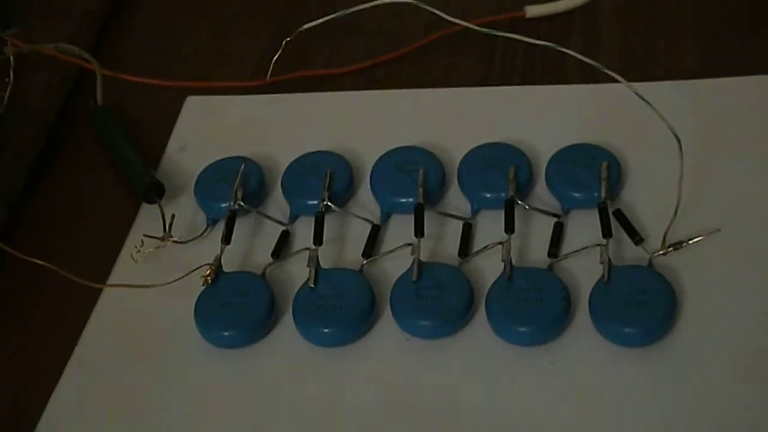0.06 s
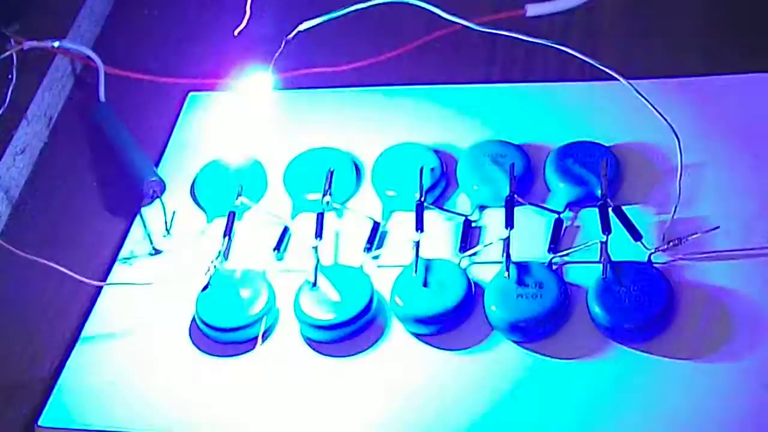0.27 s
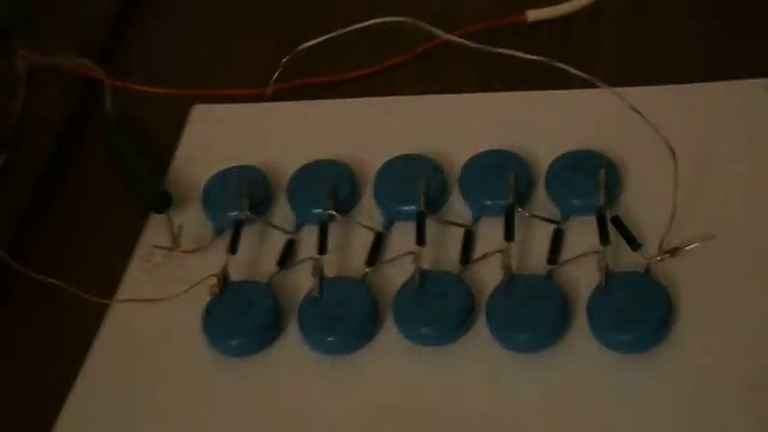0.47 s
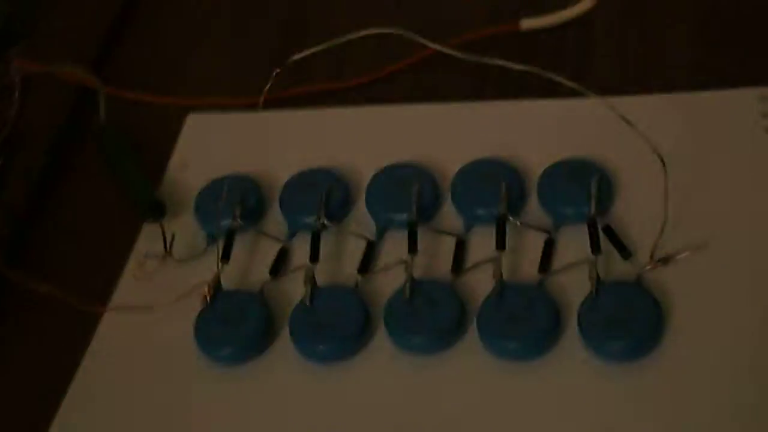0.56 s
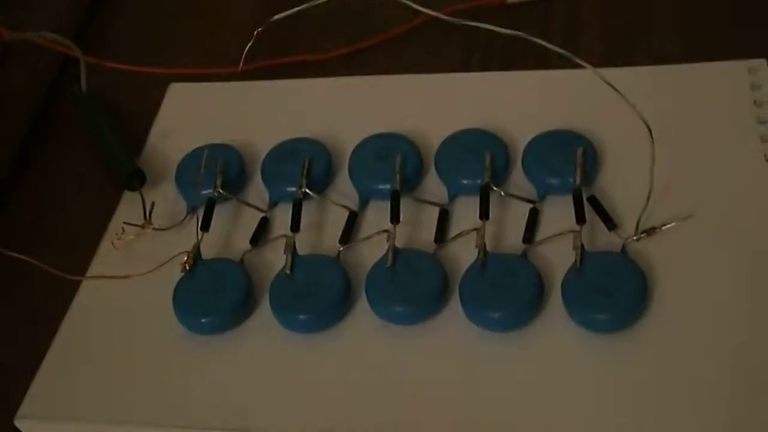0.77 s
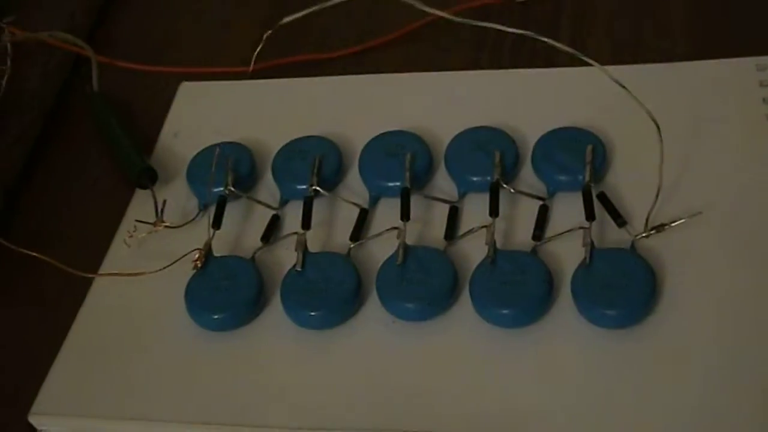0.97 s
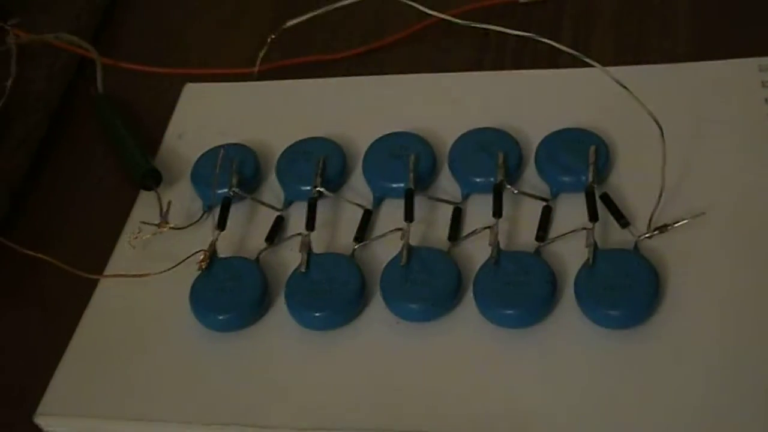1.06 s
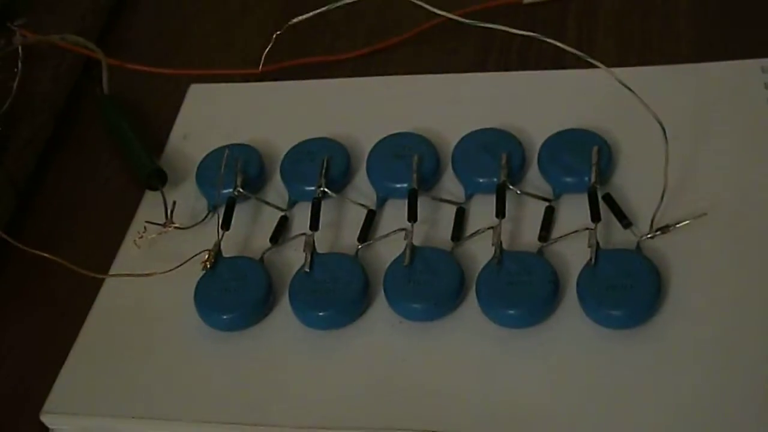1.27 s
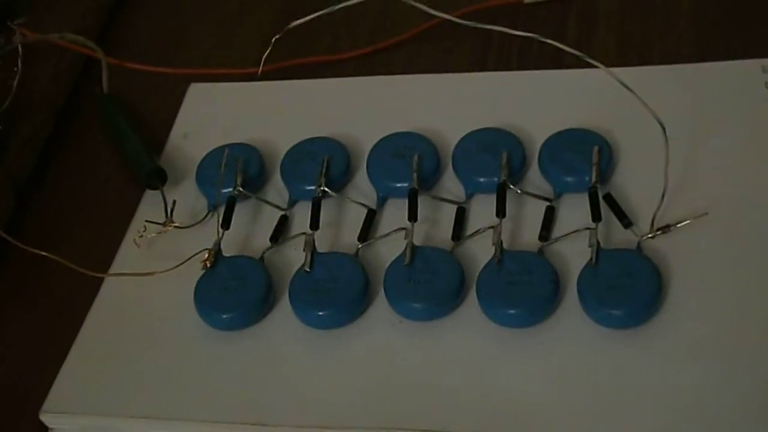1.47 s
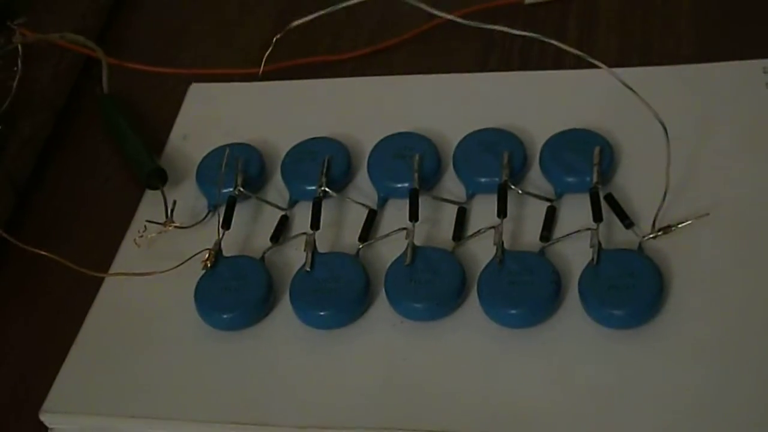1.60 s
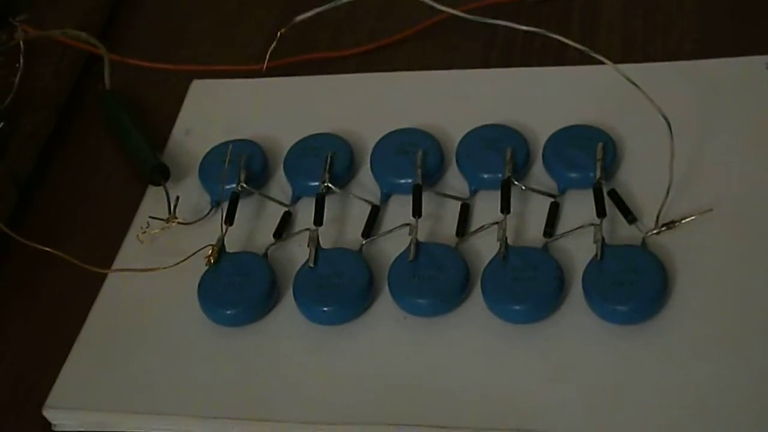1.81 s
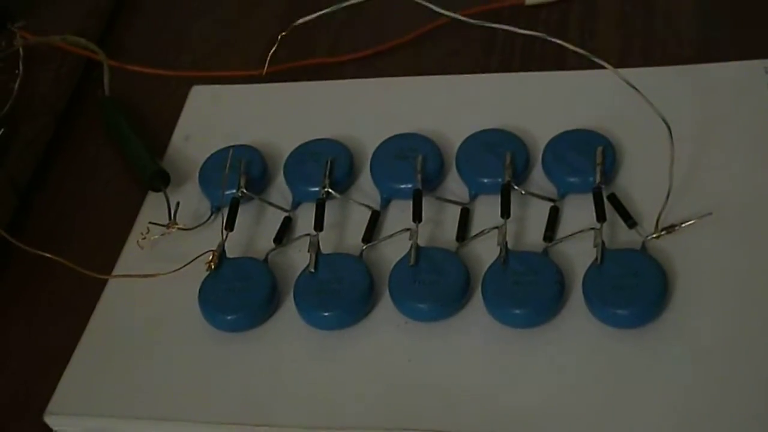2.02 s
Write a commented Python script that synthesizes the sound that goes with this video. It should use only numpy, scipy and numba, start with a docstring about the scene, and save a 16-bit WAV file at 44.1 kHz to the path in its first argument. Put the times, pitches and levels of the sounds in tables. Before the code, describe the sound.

One loud, sharp electric spark crack with a short room echo over faint fan hum.

```python
"""A capacitor-and-diode voltage multiplier arcs over on a table: one crack made of a quick train of sparks
that speeds up, then slows and stops. Each snap overloads a close microphone, whose limiter ducks and
lets the small room's echo swell back. Underneath sit a few faint ticks, a humming fan, microphone hiss
and a thin electronic whine."""
import sys
import numpy as np
from scipy import signal
from scipy.fft import rfft, irfft
from scipy.io import wavfile
from scipy.ndimage import uniform_filter1d
from numba import njit

SR = 44100
rng = np.random.default_rng(int(sys.argv[2]) if len(sys.argv) > 2 else 0)


def bounce(signal):
    """Save signal as a 16-bit WAV file at the path given by the first command-line argument."""
    frames = np.transpose(np.atleast_2d(signal))
    limited = np.clip(frames, -1, 1)
    pcm = np.round(limited * 32767).astype(np.int16)
    wavfile.write(sys.argv[1], SR, pcm)


N = 90404
T = np.arange(N) / SR
HZ = np.fft.rfftfreq(N, 1 / SR)

# The spark train. Each row: start in seconds, gain of the snap and its echo in dB, thump gain in dB.
SPARK_TRAIN = [(0.246, 7, -7), (0.2596, 7, -1.5), (0.2745, -4, 5), (.2880, -3.5, -1.5), (.3020, 8, -5.5),
               (0.3149, 1, -20.5), (0.3239, 0, -25.5), (0.3333, 1.5, -25), (0.3418, 2.5, -18),
               (0.3494, 5.5, -29), (0.357, 0.5, -28), (0.3652, 0, -27), (0.3723, 1.5, -23),
               (0.3804, 0, -21), (0.3896, -2.5, -21), (.3993, -2.5, -23), (0.4136, -7.5, -10.5),
               (0.4326, -2.5, 3.5), (.4669, -2.5, -25)]
# The ring of the overloaded microphone port. Each row: pitch in Hz, relative level in dB, T60 in seconds.
PORT_MODES = [(1150, -7, .0027), (3050, -7, .0026), (5250, -3.5, .0022), (7500, 0, .0016),
              (9010, -7, 0.0012), (14300, -5, .0008)]
# First bounces off walls and ceiling. Each row: delay in seconds, gain in dB.
REFLECTIONS = [(.0075, -28.5), (.0083, -31), (.0124, -28.5), (.0212, -30), (.026, -22.5)]
# The colour of the room's tail. Each row: frequency in Hz, relative level in dB.
TAIL_COLOUR = [(60, -32), (200, -20), (400, -8.5), (650, -5.5), (850, -1.5), (1000, -3.5), (1300, -1.5),
               (1800, -5), (2300, -3.5), (2900, 0), (3500, -1.5), (4500, -5.5), (5200, -5), (6200, -7),
               (7600, 2), (8400, -1), (10000, -5.5), (12400, -19), (15000, -37.5)]
# The length of that tail. Each row: frequency in Hz, T60 in seconds.
TAIL_DECAY = [(200, 0.39), (800, 0.38), (2800, 0.41), (5500, 0.35), (8000, 0.31), (12000, 0.2)]
# Rings of the room and things on the bench. Each row: pitch in Hz, relative level in dB, T60 in seconds.
BENCH_MODES = [(845, -24, .25), (883, -24, .35), (1100, -27, .25), (1315, -24.5, .25), (1570, -25.5, .3),
               (2514, -29, .3), (2783, -22, .25), (2900, -22, .25), (3192, -23.5, .3), (4962, -26.5, .3),
               (5342, -25.5, 0.35), (8140, -25, .25)]
# Faint ticks and scuffs. Each row: start in seconds, gain in dB, centre in Hz, width in Hz,
# decay time in seconds.
BENCH_TICKS = [(.045, -59, 2500, 900, .012), (0.1, -43, 2440, 800, 0.004), (.1015, -50, 5000, 7000, 0.0035),
               (1.04, -59, 7400, 600, .03), (1.684, -56, 3250, 2005, 0.026), (1.78, -58, 2605, 1500, .03)]
# The fan's steady tones. Each row: pitch in Hz, level in dB, pitch waver in Hz.
FAN_TONES = [(224.6, -60.5, 1.5), (346, -62.5, 8), (829, -62, 10), (1116, -66.5, 14)]
# The fan's two strongest tones. Each row: time in seconds, blade tone level in dB, upper tone level in dB.
FAN_SWELLS = [(0, -60, -63.5), (.8, -55.5, -60), (1.06, -50, -59.5), (1.17, -58.5, -52.5),
              (1.42, -57, -59.5), (1.65, -53, -57), (1.9, -59, -56.5), (2.05, -59, -58.5)]
# The bed of fan noise and microphone hiss. Each row: frequency in Hz, relative level in dB.
AIR_COLOUR = [(12, -7), (25, 2.5), (45, -3), (70, -10.5), (150, -12), (250, -12.5), (400, -9.5), (550, -12),
              (800, -11.5), (1120, -13), (1500, -21), (2000, -25), (3000, -27), (5000, -31), (9000, -32),
              (15500, -37)]
# The electronic whine. Each row: pitch in Hz, level in dB.
WHINE_TONES = [(6783, -77), (9572, -84.5), (13590, -67.5)]
# The stereo image of diffuse sound. Each row: frequency in Hz, left-right correlation from 0 to 1 (mono).
STEREO_LIKENESS = [(600, 1), (1500, 1), (3100, .97), (7000, 0.8), (14000, 1)]


def arc():
    """The crack: every spark fires the same snap, echo and thump, at its own strengths."""
    direct, low_end, spark = snap(), thump(), room_tail()
    add(spark, 0, direct)
    add(spark, .0055, bench_rings())
    wall_lowpass = signal.butter(4, 8500, fs=SR, output="sos")
    dulled = signal.sosfilt(wall_lowpass, direct)
    for delay, db in REFLECTIONS:
        add(spark, delay, amp(db) * dulled)
    out = np.zeros((2, N))
    for start, snap_db, thump_db in SPARK_TRAIN:
        add(out, start, amp(snap_db) * spark + amp(thump_db) * low_end)
    return out


def snap(gain_db=29.5, rise_s=.00008, lowcut_hz=540):
    """The transient: a spark's shock front rings the microphone port for about a millisecond."""
    t = T[T < .01]
    ring = sum(amp(db - 60 * t / t60) * np.sin(2 * np.pi * hz * t) for hz, db, t60 in PORT_MODES)
    attack = 1 - np.exp(-t / rise_s)
    lowcut = signal.butter(2, lowcut_hz, "high", fs=SR, output="sos")
    return -amp(gain_db) * signal.sosfilt(lowcut, ring * attack)


def thump(gain_db=6.5, pulse_s=.000356, rebound_s=.011):
    """A spark's low thump, likely electrical pickup: a short pulse, then a slow, shallow rebound."""
    pulse = (T / pulse_s) ** 2 * np.exp(-T / pulse_s)
    rebound = (T / rebound_s) ** 2 * np.exp(-T / rebound_s)
    depth = 1.2 * pulse_s / rebound_s  # the rebound has 1.2 times the area of the pulse
    return amp(gain_db) * (depth * rebound - pulse)


def room_tail(energy_db=26, predelay_s=.0055, build_s=.002, early_db=-4):
    """The room's answer to one spark: softer at first, then full, the treble dying soonest."""
    wash = diffuse(amp(curve(TAIL_COLOUR, HZ)))
    hz, t, spectrum = signal.stft(wash, SR, nperseg=256)
    decay = amp(-60 * t / curve(TAIL_DECAY, hz)[:, None])
    tail = signal.istft(spectrum * decay, SR, nperseg=256)[1][:, :N]
    build = 1 - np.exp(-np.maximum(T - predelay_s, 0) / build_s)
    tail *= amp(early_db) + (1 - amp(early_db)) * build
    return amp(energy_db) * tail / np.linalg.norm(tail[0])


def bench_rings():
    """Narrow resonances that a spark leaves ringing in the room and on the bench."""
    return sum(amp(db - 60 * T / t60) * np.sin(2 * np.pi * (hz * T + rng.random()))
               for hz, db, t60 in BENCH_MODES)


def ticks(rise_s=.0004):
    """Faint small noises near the bench, each a burst of noise in one resonance."""
    out = np.zeros((2, N))
    for start, db, hz, width_hz, decay_s in BENCH_TICKS:
        resonance = 1 / (1 + (2 * (HZ - hz) / width_hz) ** 2)
        envelope = np.minimum(T / rise_s, 1) * np.exp(-T / decay_s)
        add(out, start, amp(db) * diffuse(resonance) * envelope)
    return out


def fan(blade_hz=443, upper_hz=680):
    """The fan's hum: wavering tones, the two strongest swelling and sinking."""
    times, blade_db, upper_db = np.transpose(FAN_SWELLS)
    hum = sum(amp(db) * tone(hz, waver_hz) for hz, db, waver_hz in FAN_TONES)
    blade = amp(np.interp(T, times, blade_db)) * tone(blade_hz, waver_hz=5)
    upper = amp(np.interp(T, times, upper_db)) * tone(upper_hz, waver_hz=5)
    return hum + blade + upper


def air(level_db=-48):
    """A steady bed of fan noise and microphone hiss."""
    return amp(level_db) * diffuse(amp(curve(AIR_COLOUR, HZ)))


def whine():
    """Thin electronic tones, high up and drifting slightly."""
    return sum(amp(db) * tone(hz, waver_hz=6) for hz, db in WHINE_TONES)


def tone(hz, waver_hz, drift_s=.04):
    """A sine at rms 1 whose pitch wanders a little."""
    drift = unit(uniform_filter1d(rng.standard_normal(N), round(drift_s * SR)))
    return unit(np.sin(2 * np.pi * np.cumsum(hz + waver_hz * drift) / SR))


def diffuse(colour):
    """Stereo noise of the given spectrum at rms 1, a little wider in the treble."""
    mid, side = rfft(rng.standard_normal((2, N)))
    likeness = curve(STEREO_LIKENESS, HZ)
    mid, side = mid * np.sqrt(1 + likeness), side * np.sqrt(1 - likeness)
    return unit(irfft(np.array([mid + side, mid - side]) * colour, N))


def amp(db):
    """Decibels to gain."""
    return 10 ** (np.asarray(db) / 20)


def unit(x):
    """Scales to rms 1."""
    return x / np.sqrt(np.mean(x ** 2) + 1e-20)


def curve(points, hz):
    """Reads a table on a log-frequency axis."""
    point_hz, values = np.transpose(points)
    return np.interp(np.log(hz + 1), np.log(point_hz + 1), values)


def add(mix, start_s, sound):
    """Drops a sound into the mix at its start time."""
    part = mix[..., round(start_s * SR):][..., :sound.shape[-1]]
    part += sound[..., :part.shape[-1]]


def scene():
    """The arc up front, the quiet room behind it."""
    return arc() + fan() + whine() + air() + ticks()


@njit
def duck(over_db, attack_s=.00075, release_db_per_s=362.5, ease_db=2):
    """The limiter's gain reduction in dB: chases any excess, lets go steadily and eases back to rest."""
    attack = 1 - np.exp(-1 / (attack_s * SR))
    cut_db, held = np.zeros(len(over_db)), 0.
    for i in range(len(over_db)):
        if over_db[i] > held:
            held += (over_db[i] - held) * attack
        else:
            held -= release_db_per_s / SR * held / (held + ease_db)
        cut_db[i] = held
    return cut_db


def record(dry):
    """A limiter too slow for the snaps, hard clipping, a slight lag of the left treble, then a high cut."""
    threshold_db, detector_s, smooth_s = -7.5, .0002, .00022
    level = abs(uniform_filter1d(abs(dry).max(0), round(detector_s * SR)))
    cut_db = duck(20 * np.log10(level + 1e-9) - threshold_db)
    pole = np.exp(-1 / (smooth_s * SR))
    ducked = dry * amp(-signal.lfilter([1 - pole], [1, -pole], cut_db))
    left, right = np.clip(ducked, -1, 1)
    lag_s = .000022 * (1 - np.exp(-(HZ / 4000) ** 4))  # sets in around 4 kHz
    left = irfft(rfft(left) * np.exp(-2j * np.pi * HZ * lag_s), N)
    high_cut = signal.firwin(255, cutoff=16160, window=("kaiser", 8), fs=SR)
    return signal.oaconvolve(np.array([left, right]), high_cut[None], "same")


dry = scene()
out = record(dry)
bounce(out)
```